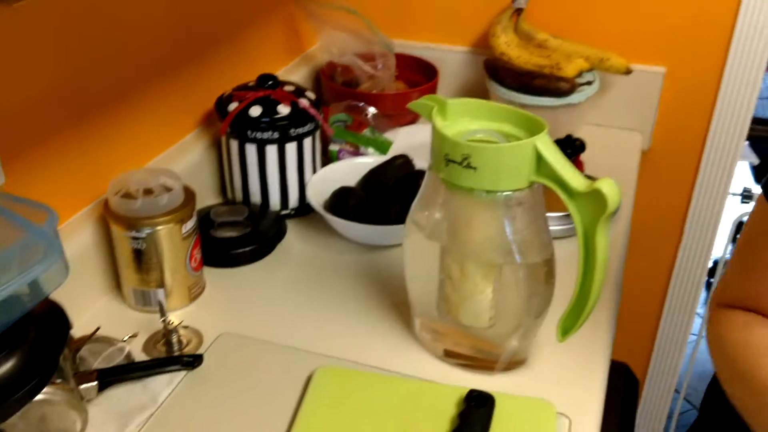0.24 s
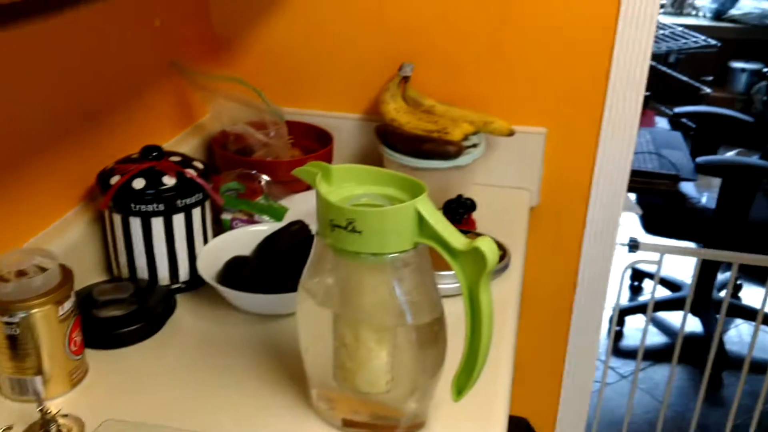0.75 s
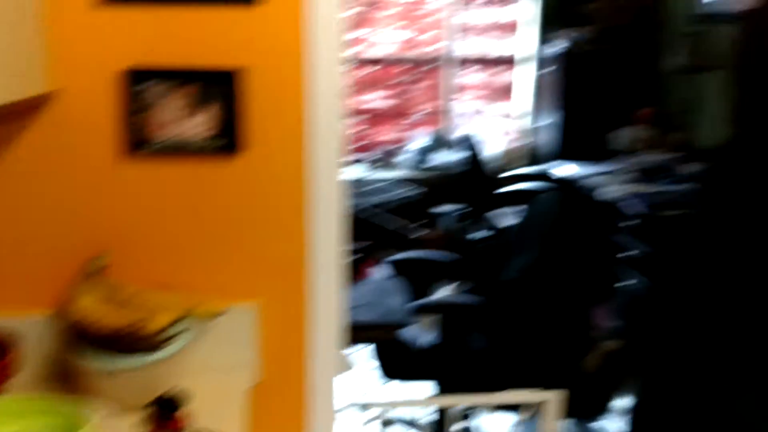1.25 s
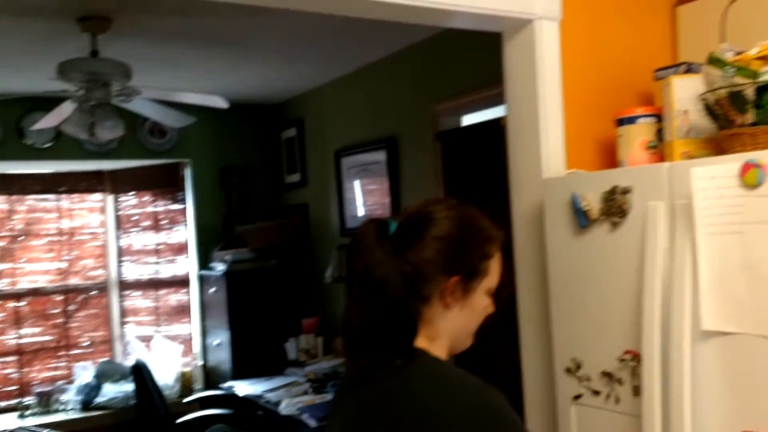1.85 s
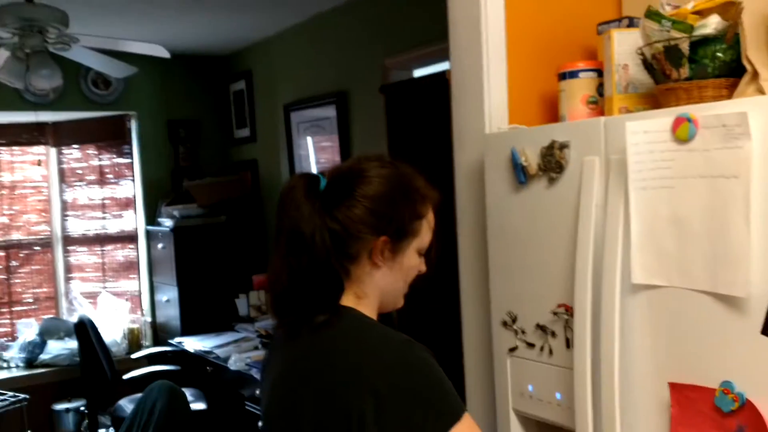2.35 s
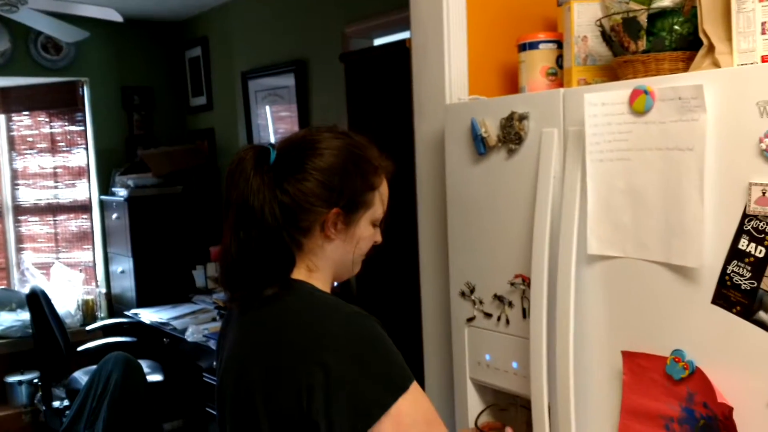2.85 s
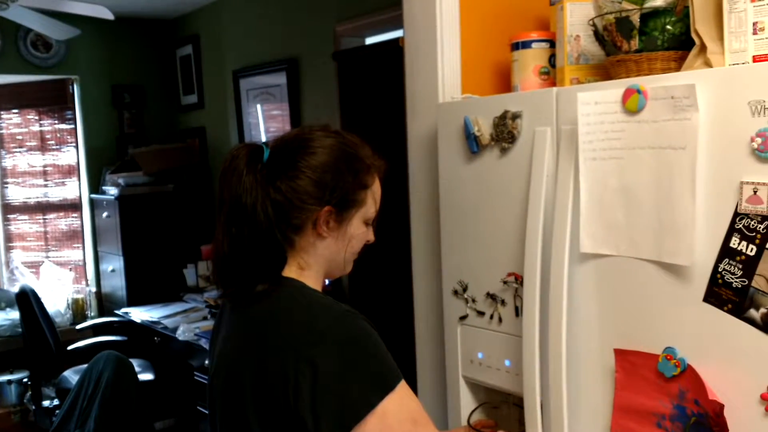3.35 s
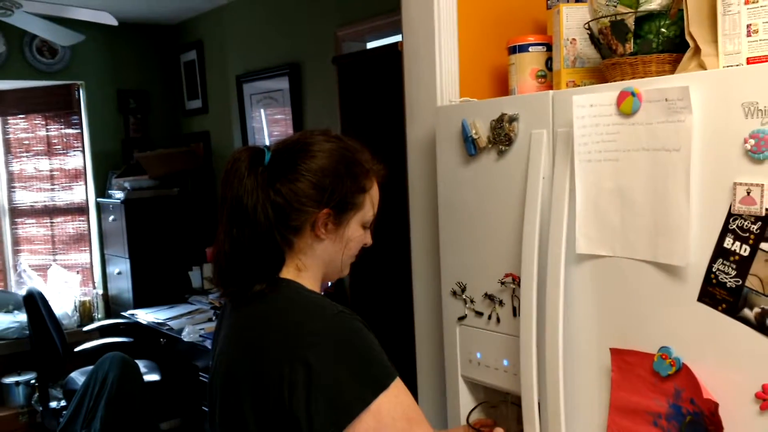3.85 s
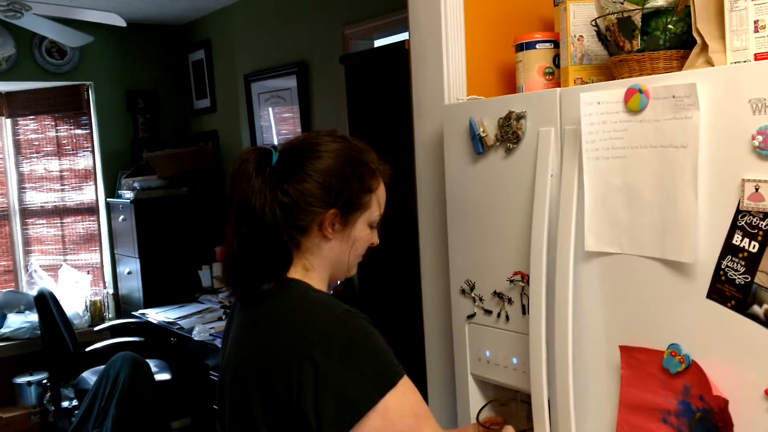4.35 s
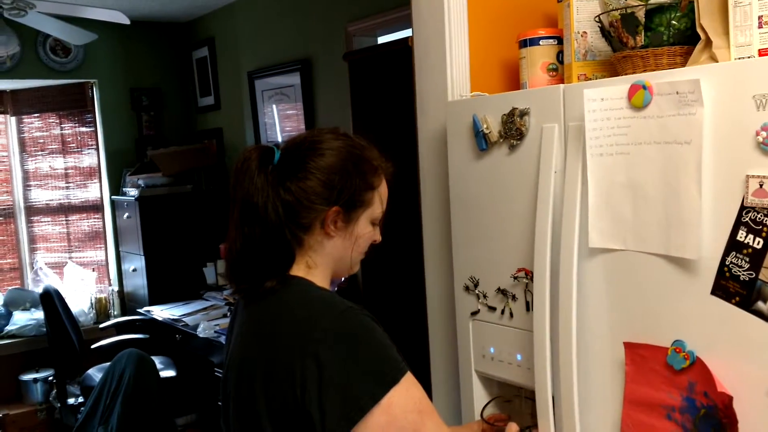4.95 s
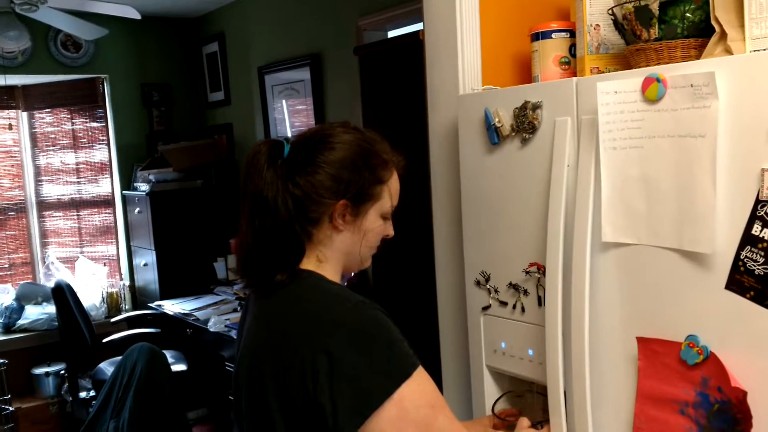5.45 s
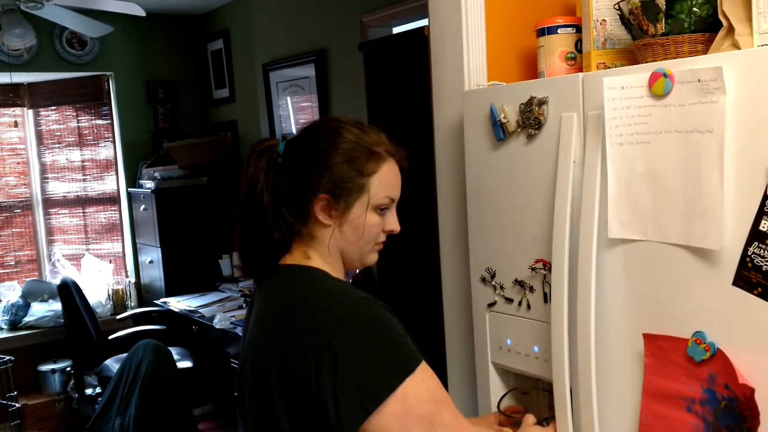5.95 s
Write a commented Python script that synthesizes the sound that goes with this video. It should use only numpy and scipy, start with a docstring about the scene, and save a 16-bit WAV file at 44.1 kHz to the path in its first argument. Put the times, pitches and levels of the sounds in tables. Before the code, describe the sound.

Soft bumps on a hand-held microphone and the scuff of a shoe lead to a quick cluster of thuds and clacks as a jug meets a refrigerator's water dispenser. The lever clicks, and water hisses and splashes steadily into the jug over the buzz of the valve, glugging more as it fills. It is heard from a few steps away in a small kitchen with a low appliance hum.

```python
"""Filling a jug at the refrigerator door

A small kitchen, heard from a few steps away on a hand-held pair of microphones that picks up soft
bumps from the hand. Over the compressor's hum a foot scuffs, a glass jug knocks into the dispenser's
recess and the lever snaps. The valve buzzes and hisses, and the jet drags air under the water,
where the bubbles ring as patter, plinks, splashes and gurgles."""
import sys
import numpy as np
from scipy import signal
from scipy.fft import rfft, irfft, next_fast_len
from scipy.io import wavfile

SR = 44100
rng = np.random.default_rng(int(sys.argv[2]) if len(sys.argv) > 2 else 0)


def wrap_up_sound(samples):
    """Save the sound to the file named by the first command line argument, as 16-bit audio."""
    columns = np.atleast_2d(samples).T
    # keep every value between -1 and 1, then stretch to whole-number steps
    tamed = np.clip(columns, -1, 1)
    steps = np.round(tamed * 32767).astype(np.int16)
    wavfile.write(sys.argv[1], SR, steps)


N = 272979
TIME = np.arange(N) / SR


def from_db(db):
    """Decibels to gain."""
    return 10 ** (np.asarray(db) / 20)


def rms_one(x):
    """Scale to unit rms."""
    return x / np.sqrt(np.mean(x ** 2) + 1e-20)


def at_hz(points, hz):
    """Read a table on a log-frequency axis."""
    f, value = np.transpose(points)
    return np.interp(np.log(np.maximum(hz, 1)), np.log(f), value)


def drift(per_s):
    """A random wander of unit rms."""
    knots = rng.standard_normal(1000)
    return rms_one(np.interp(TIME * per_s, np.arange(len(knots)), knots))


def as_event(x):
    """Give a short sound the energy of 10 ms at unit rms."""
    return x * np.sqrt(SR / 100 / (np.sum(x ** 2) + 1e-20))


def add(track, s, sound):
    """Mix a sound into a track at s seconds."""
    at = int(s * SR)
    track[at:at + len(sound)] += sound[:max(N - at, 0)]


def pair_noise(size):
    """White noise at both microphones, alike in the midrange, nearly unrelated at either end."""
    # Each row: frequency in Hz, likeness of left and right from 0 to 1.
    likeness = [(60, 0.078), (500, 0.25), (1100, 1), (1500, 0.94), (2200, 0.99), (3600, 0.87), (4300, 1),
                (5000, 0.7), (7500, 0.54), (9500, 0.029), (16000, 0.067)]
    alike = np.clip(at_hz(likeness, np.fft.rfftfreq(size, 1 / SR)), 0, 1)
    mid, side = rfft(rng.standard_normal((2, size)))
    return irfft(np.sqrt((1 + alike) / 2) * mid + np.sqrt((1 - alike) / 2) * side * [[1], [-1]], size)


def hiss(spectrum):
    """Steady stereo noise with a spectrum in dB per Hz."""
    size = next_fast_len(N, real=True)
    gain = from_db(at_hz(spectrum, np.fft.rfftfreq(size, 1 / SR))) * np.sqrt(SR / 2)
    return irfft(rfft(pair_noise(size)) * gain, size)[:, :N]


def hum(harmonics, base_hz, waver_db):
    """Harmonics of a mains-driven part, each wavering a little in level."""
    out = 0
    for multiple, db in harmonics:
        amplitude = np.sqrt(2) * from_db(db + waver_db * drift(12))
        out = out + amplitude * np.sin(2 * np.pi * (multiple * base_hz * TIME + rng.random()))
    return out


def struck(modes, times, levels_db, tilts=0):
    """Each blow rings a part's modes unevenly; a tilt in dB per octave brightens hard contacts."""
    t, out = TIME[:SR // 4], np.zeros(N)
    hz, db, t60 = np.transpose(modes)[:, :, None]
    rings = from_db(db - 60 * t / t60) * np.sin(2 * np.pi * hz * t)
    signs = (-1) ** np.arange(len(modes))
    for s, level_db, tilt in np.broadcast(times, levels_db, tilts):
        strengths = signs * from_db(tilt * np.log2(hz[:, 0]) + 2 * rng.standard_normal(len(modes)))
        add(out, s, from_db(level_db) * as_event(strengths @ rings))
    return out


def room_tone():
    """Still air and the steady hum of the compressor."""
    # Each row: frequency in Hz, level in dB per Hz.
    air = [(30, -104), (60, -108), (120, -96.5), (250, -92), (500, -98.5), (1000, -100), (1700, -104),
           (2200, -114), (3200, -107), (4800, -110), (9000, -106), (13000, -102), (15500, -105)]
    # Each row: multiple of the compressor's speed, rms level in dB.
    compressor = [(1, -74), (2, -76)]
    return hiss(air) + hum(compressor, base_hz=59.2, waver_db=-1.5)


def finger_taps():
    """Fingers tick on the microphone housing, which rings briefly."""
    # Each row: start in seconds, level in dB.
    taps = [(0.212, -62.5), (.257, -59), (.679, -63.5)]
    # Each row: mode frequency in Hz, relative level in dB, t60 in seconds.
    housing = [(750, 13, 0.01), (1160, 9, 0.011), (1600, 6, 0.0076)]
    return struck(housing, *np.transpose(taps))


def handling():
    """Bumps, slips and tremor of the hand push the two microphones in opposite directions."""
    # Each row: start in seconds, level in dB, pitch in Hz that the bump sags towards.
    bumps = [(.228, -40, 56.4), (0.681, -45, 80), (0.805, -49, 66.6), (0.943, -42.5, 62), (1.354, -46, 63),
             (1.474, -40, 81.5), (1.516, -35, 83), (2.745, -37.5, 60.7), (4.233, -34.5, 92)]
    t, out = TIME[:SR // 6], np.zeros(N)

    def thump(hz, cycles):
        """A heavily damped swing that starts sharp and sags."""
        pitch = hz * (1 + 1.24 * np.exp(-t * hz))
        return as_event(np.sin(2 * np.pi * np.cumsum(pitch) / SR) * np.exp(-t * hz / cycles))

    for s, db, hz in bumps:
        add(out, s, from_db(db) * as_event(thump(hz, cycles=0.26) * t))
    # The grip creaks in a run of small slips while the hand turns.
    turn_start_s, turn_end_s, slip_gap_s = 1.155, 1.305, 1 / 53
    slip_times = np.arange(turn_start_s, turn_end_s, slip_gap_s)
    for s, (late, size, detune) in zip(slip_times, 2 * rng.random((100, 3)) - 1):
        slip = thump(hz=98 * np.exp(0.49 * detune), cycles=1)
        add(out, s + 0.26 * late * slip_gap_s, from_db(-44 + 4 * size) * slip)
    low_band = signal.butter(2, [55, 120], "band", fs=SR, output="sos")
    tremor = rms_one(signal.sosfilt(low_band, rng.standard_normal(N)))
    return (out + from_db(-60 + 2 * drift(13)) * tremor) * [[-.6], [1.15]]


def stroke(peak_s, release_s):
    """The envelope of one slide of the sole: a quick swell and a slower release."""
    attack_s = 0.4 * release_s
    return np.exp(np.minimum((TIME - peak_s) / attack_s, (peak_s - TIME) / release_s))


def foot_scuffs():
    """Soft scuffs and rustles, each with its own brightness."""
    # Each row: peak time in seconds, gain in dB, release in seconds, tilt in dB per octave.
    scuffs = [(.65, -22, 1, 6.5), (0.837, -9.5, 0.069, 1.5), (0.958, 0.5, 0.053, 5), (1.06, -2.5, 0.16, 1),
              (1.429, -7.5, 0.37, -1)]
    # Friction noise. Each row: frequency in Hz, relative level in dB.
    sole = [(500, -81), (1100, -86), (1750, -88), (2300, -86.5), (3500, -90), (7000, -90.5), (10000, -94.5),
            (15000, -99)]
    out = 0
    for s, db, release_s, tilt in scuffs:
        friction = hiss([(hz, level + tilt * np.log2(hz / 3500)) for hz, level in sole])
        out = out + from_db(db) * stroke(s, release_s) * friction
    return out * from_db(1.5 * drift(61.5))


def foot_rasps():
    """The sole catches on the floor in short gritty rasps."""
    # Each row: peak time in seconds, gain in dB, release in seconds.
    catches = [(.835, -1.5, 0.031), (0.971, -4, 0.098), (1.07, -7, 0.039)]
    # Each row: frequency in Hz, relative level in dB.
    narrow_band = [(1100, -115), (1500, -92.5), (1800, -79.5), (2050, -94), (2600, -120)]
    envelope = sum(from_db(db) * stroke(s, release_s) for s, db, release_s in catches)
    return envelope * from_db(2.2 * drift(150)) * hiss(narrow_band)


def jug_knocks():
    """The jug thuds on the door, clacks in the plastic recess and snaps the lever: three tracks."""
    # Each row: start in seconds, thud, clack and snap levels in dB, clack tilt in dB per octave.
    knocks = [(1.505, -23.5, -24, -51, -2), (1.555, -29.5, -32, -43, 5), (1.74, -44, -36, -45, -2.5),
              (1.8219, -37.5, -21, -24.5, 5), (1.887, -27.5, -34.5, -56, -5)]
    # Modes of the two parts. Each row: frequency in Hz, relative level in dB, t60 in seconds.
    door = [(100, -12, 0.1), (180, -4, 0.053), (224.5, -8.5, 0.24), (254, -6.5, 0.075), (321, -1.5, 0.11),
            (329, -3.5, 0.044), (365.5, 0, 0.1), (620, -6, 0.035)]
    recess = [(714, -3, 0.021), (1024, -3, 0.022), (1220, 2.5, 0.0085), (1620, 3, 0.0089),
              (1670, -0.5, 0.01), (2180, 6.5, 0.0077), (2703, -9.5, 0.029), (3060, 2.5, 0.0017)]
    stages = [(-.0036, 9.5), (0, 0), (0.033, 11.5)]  # first touch, blow, bounce
    contacts = [(s + delay_s, *(np.array(levels) - loss_db), tilt)
                for s, *levels, tilt in knocks for delay_s, loss_db in stages]
    times, thud_db, clack_db, snap_db, tilts = np.transpose(contacts)
    snap = lever_snaps(times, snap_db)
    low_cut = signal.butter(3, 556, "high", fs=SR, output="sos")
    clack = signal.sosfilt(low_cut, struck(recess, times, clack_db, tilts))
    thud = struck(door, times + 0.002, thud_db)  # the heavy door answers a little late
    return thud, clack, snap


def lever_snaps(times, levels_db, burst_s=0.0013):
    """Stiff plastic cracks for a millisecond or two, and the lever's spring rings faintly."""
    # Each row: frequency in Hz, relative level in dB.
    crack_spectrum = [(2500, -43), (3800, 5), (4500, -14), (4850, 5.5), (5400, 16), (6000, 8), (8000, 0),
                      (11500, 1.5), (15500, 2.5)]
    # Each row: mode frequency in Hz, relative level in dB, t60 in seconds.
    spring = [(5120, -13, 0.04), (5650, -9, 0.024)]
    t, out = TIME[:SR // 40], np.zeros(N)
    colour = from_db(at_hz(crack_spectrum, np.fft.rfftfreq(len(t), 1 / SR)))
    for s, db in zip(times, levels_db):
        crack = irfft(rfft(rng.standard_normal(len(t))) * colour, len(t))
        add(out, s, from_db(db) * as_event(crack * np.exp(-t / burst_s)))
    return out + struck(spring, times, levels_db - 9)


def valve(open_s=2.05):
    """The solenoid buzzes and water rushes through the open valve."""
    # Each row: multiple of the mains frequency, rms level in dB.
    buzz = [(2, -71.5), (4, -71), (6, -60.5), (8, -70.5), (11, -71.5), (12, -67.5), (14, -66.5), (16, -75),
            (20, -78.5), (28, -81.5)]
    # Each row: frequency in Hz, relative level in dB.
    rush = [(130, -105), (210, -87.5), (330, -84.5), (480, -92.5), (700, -83.5), (1000, -100.5),
            (1500, -102), (2500, -105), (5000, -108), (10000, -111), (12700, -109), (13100, -99),
            (13450, -112), (15000, -114)]
    opened = np.clip((TIME - open_s) / 0.08, 0, 1)
    return opened * (hum(buzz, base_hz=60, waver_db=2) + from_db(2.5) * hiss(rush))


def splashes(cycles=25.6, length_s=.016, count=20):
    """Each splash sheds a quick flurry of small bubbles, thinning out."""
    # Each row: start in seconds, level in dB, centre pitch in Hz, pitch spread in octaves.
    flurries = [(2.108, -52.5, 9160, 0.33), (2.722, -58, 7450, .08), (2.86, -50.5, 5550, 0.31),
                (3.086, -53, 9700, 0.16), (3.146, -54.5, 11200, 0.11), (3.187, -57, 9250, 0.16),
                (3.248, -51, 8800, 0.091), (3.308, -50.5, 11600, 0.24), (3.69, -48.5, 10600, 0.46),
                (3.712, -49.5, 2890, 0.13), (3.712, -57, 5740, 0.13), (3.806, -52.5, 5840, 0.14),
                (3.992, -45.5, 13300, 0.22), (3.992, -49, 2740, 0.72), (4.006, -50, 2900, 0.542),
                (4.162, -46.5, 5670, 0.48), (4.169, -46.5, 2770, 0.27), (4.313, -47, 2610, 0.17),
                (4.519, -44, 3100, 0.45), (4.846, -47.5, 2220, 0.8), (4.941, -43.5, 8800, 0.16),
                (4.942, -56, 1890, 0.19), (5.046, -44, 2340, 0.093), (5.145, -49, 2600, 0.21),
                (5.274, -54.5, 3320, 0.085), (5.47, -54, 2820, 0.11), (5.495, -49.5, 2560, 0.26),
                (5.545, -55, 12000, 0.3), (5.57, -50, 2730, 0.34), (5.78, -59, 5400, 0.11),
                (5.907, -44.5, 2230, 0.19), (6.053, -52, 11100, 0.24)]
    t, out = TIME[:SR // 16], np.zeros(N)
    for s, db, centre_hz, octaves in flurries:
        late, up, down = rng.random((3, count, 1))
        hz = centre_hz * 2 ** (np.sqrt(6) * octaves * (up - down))
        age = np.maximum(t - length_s * late ** 2, 0)
        rings = np.exp(-np.log(1000) * age * hz / cycles - late) * np.sin(2 * np.pi * hz * age)
        add(out, s, from_db(db) * as_event(rings.sum(axis=0)))
    return out


def nozzle(peak_s=2.45, rise_db_per_s=100, fade_db_per_s=1):
    """The jet hisses thinly as it starts and fades as it settles."""
    # Each row: frequency in Hz, relative level in dB.
    jet = [(5000, -125), (10500, -114), (13000, -101), (15000, -110)]
    age = TIME - peak_s
    return from_db(5 + np.minimum(rise_db_per_s * age, -fade_db_per_s * age)) * hiss(jet)


def bubble_cloud(spectrum, power, per_s, cycles, spread_db, fall_oct_per_s=0):
    """Bubbles of random pitch and size ring for some cycles; they come thicker as the power rises."""
    rate = per_s * np.clip((power / np.mean(power)) ** .7, .02, 15)
    born = np.cumsum(rate) / SR
    late, pitch_draw, size_draw, sign_draw = rng.random((20000, 4))[:int(born[-1])].T
    starts = np.minimum(np.searchsorted(born, np.arange(len(late)) + late), N - 1)
    low_hz, high_hz = spectrum[0][0], spectrum[-1][0]
    pitches = low_hz * (high_hz / low_hz) ** pitch_draw
    scatter_db = spread_db * np.minimum(-np.log(1 - size_draw), 3.5)
    sizes = rms_one(from_db(at_hz(spectrum, pitches) + scatter_db))
    heights = sizes * np.sign(sign_draw - .5) * np.sqrt(power[starts] / rate[starts])
    # With a fall, bubbles start high and sink to the listed pitches as the jug fills.
    pitches = pitches * 2 ** (fall_oct_per_s * (TIME[-1] - TIME[starts]))
    out = np.zeros(N)
    for at, hz, height in zip(starts, pitches, heights):
        t60 = cycles / hz
        t, damping = TIME[:int(t60 * SR)], np.log(1000) / t60
        ring = 2 * np.sqrt(damping) * np.exp(-damping * t) * np.sin(2 * np.pi * hz * t)
        add(out, at / SR, height * ring)
    return out


def stream(lands_s=2.7, pool_forms_s=1.3):
    """The jet drags air under: a growing gurgle, surface splatter, fine spray and stray plinks."""
    # Four families of bubbles. Each row: pitch in Hz, relative level in dB.
    gurgle = [(520, -26), (610, 19), (700, 11.5), (800, 9.5), (1000, 8), (1350, -9)]
    splatter = [(1000, 3), (1400, -0.5), (1650, -2.5), (2100, 8), (2600, 2), (3200, 2.5), (3900, 0)]
    spray = [(4000, 23), (4900, 11.3), (7500, 16), (10000, 0.69), (15000, 4.6)]
    plinks = [(1100, -3), (1700, -2), (2600, 11.5)]
    filling_s = np.maximum(TIME - lands_s, 0)
    landed = np.clip(filling_s / .2, 0, 1)
    # Splatter is weak until a pool has formed, then softens by 1 dB a second as it deepens.
    pool_age_s = filling_s - pool_forms_s
    pool_db = np.minimum(15 * pool_age_s / pool_forms_s, -pool_age_s)
    gurgle_power, splatter_power, spray_power = [
        landed * from_db(db + 1.8 * drift(25)) ** 2
        for db in (-71 + 3.5 * filling_s, -60 + pool_db, -64.5)]
    plink_power = landed * from_db(-63.5 + pool_db / 2) ** 2
    return (bubble_cloud(gurgle, gurgle_power, per_s=350, cycles=43, spread_db=5, fall_oct_per_s=0.176)
            + bubble_cloud(splatter, splatter_power, per_s=330, cycles=60, spread_db=3.5)
            + bubble_cloud(spray, spray_power, per_s=600, cycles=45, spread_db=8.5)
            + bubble_cloud(plinks, plink_power, per_s=16, cycles=65, spread_db=-3.5))


def ping(hz, db, cycles, swell_cycles, rise):
    """A sine swells and dies away while its pitch climbs, like a bubble nearing the surface."""
    age_cycles = TIME[:SR // 8] * hz
    pitch = hz * (1 + rise * (np.minimum(age_cycles / cycles, 1) - 1 / 4))
    envelope = (1 - np.exp(-(age_cycles / swell_cycles) ** 2)) * from_db(-60 * age_cycles / cycles)
    return from_db(db) * as_event(np.sin(2 * np.pi * np.cumsum(pitch) / SR) * envelope)


def drips():
    """Drips and small splashes in the pool, each a short pitched ping."""
    # Each row: start in seconds, level in dB, pitch in Hz.
    pings = [(2.864, -55, 5030), (2.9, -58, 5770), (3.122, -62, 4650), (3.169, -51, 2300),
             (3.309, -51.5, 2310), (3.415, -53, 1470), (3.428, -51, 2250), (3.505, -59, 3600),
             (3.519, -55, 6940), (3.54, -56, 1690), (3.65, -52.5, 2554), (3.68, -46.5, 7150),
             (3.72, -54, 2490), (3.86, -55.5, 4650), (3.908, -51.5, 1750), (4.172, -45.5, 2655),
             (4.215, -50, 2300), (4.47, -57, 4770), (4.787, -60.5, 4830), (4.845, -56, 4910),
             (4.854, -42, 2110), (4.897, -59, 4830), (4.974, -49.5, 1894), (4.996, -56, 4740),
             (5.535, -63, 4850), (5.659, -44.5, 4940), (5.67, -43, 2190), (5.909, -53, 1700),
             (6.05, -53, 1850)]
    out = np.zeros(N)
    for s, db, hz in pings:
        add(out, s, ping(hz, db, cycles=63, swell_cycles=5.7, rise=0.028))
    return out


def glugs(fragments=7, gap_s=.011, fade_db_per_s=90):
    """A pocket of air goes under as one big bubble and breaks into a dying run of smaller ones."""
    # Each row: start in seconds, level in dB, pitch in Hz, tending deeper as the jug fills.
    pockets = [(3.335, -50.5, 1030), (4.321, -42, 990), (4.516, -50, 1170), (4.848, -50.5, 1260),
               (4.892, -45, 880), (5.025, -47.5, 1000), (5.142, -49, 926), (5.486, -33.5, 754),
               (5.668, -40, 800), (5.938, -46, 746), (5.992, -45, 648), (6.024, -41.5, 657)]
    out = np.zeros(N)
    for s, db, hz in pockets:
        add(out, s, ping(hz, db, cycles=26.5, swell_cycles=8.7, rise=0.25))
        for k, (late, smaller) in enumerate(rng.random((fragments, 2)), 1):
            delay_s = gap_s * (k + late)
            small_hz, small_db = hz * np.exp(0.26 * smaller), db - 10 - fade_db_per_s * delay_s
            add(out, s + delay_s, ping(small_hz, small_db, cycles=20, swell_cycles=2, rise=.15))
    return out


def kitchen(x, direct_db, early_db, early_s, tail_db):
    """Direct sound, a cluster of reflections from the recess and walls, and a tail that dies by band."""
    # Each row: band centre in Hz, reverberation time (t60) in seconds.
    bands = [(100, 0.52), (400, 0.47), (2000, 0.38), (6000, 0.39), (15000, 0.19)]
    t = TIME[:SR // 2]
    white, hz = rfft(pair_noise(len(t))), np.fft.rfftfreq(len(t), 1 / SR)
    centres, tail = [row[0] for row in bands], 0
    for share, (_, t60) in zip(np.eye(len(bands)), bands):
        tail = tail + irfft(white * np.interp(hz, centres, share), len(t)) * from_db(-60 * t / t60)
    early = pair_noise(len(t)) * t * np.exp(-t / early_s)
    response = (from_db(early_db) * rms_one(early) + from_db(tail_db) * rms_one(tail)) / np.sqrt(len(t))
    response[:, 0] += from_db(direct_db)
    return signal.fftconvolve(x[None], response, axes=1)[:, :N]


def scene():
    """Knocks and water echo in the kitchen, over jet, valve, foot, room tone and handling."""
    water = stream() + splashes()
    background = room_tone()
    thud, clack, snap = jug_knocks()
    in_room = (kitchen(thud, direct_db=-2, early_db=-13, early_s=0.005, tail_db=-7)
               + kitchen(clack, direct_db=-5.5, early_db=-16.5, early_s=0.0056, tail_db=-4.5)
               + kitchen(snap, direct_db=-2.5, early_db=-13, early_s=0.003, tail_db=-6)
               + kitchen(water, direct_db=-3, early_db=-3, early_s=0.0052, tail_db=-1.5)
               + kitchen(drips() + glugs(), direct_db=-1, early_db=-13, early_s=0.008, tail_db=-4))
    hand = handling() + finger_taps()
    return in_room + nozzle() + valve() + foot_scuffs() + foot_rasps() + background + hand


def record(dry):
    """The recorder adds peaks near 2 and 5 kHz, colours the sides differently and cuts both ends."""
    # Each row: centre in Hz, width in Hz, boost in dB.
    colour_peaks = [(1710, 55, 3), (2095, 544, 9), (4793, 298, 8.5)]
    # Each row: frequency in Hz, left minus right in dB.
    balance = [(100, 2.5), (1000, -2.5), (2200, -0.15), (5000, -1.5), (7500, 2.5), (10000, 2),
               (13000, -4.5), (15500, -5)]
    left_lag_s, lag_from_hz = 0.0004614, 1065  # the left side lags in the treble
    low_cut_hz, high_cut_hz = 48, 15500
    for hz, width_hz, db in colour_peaks:
        dry = dry + (from_db(db) - 1) * signal.lfilter(*signal.iirpeak(hz, hz / width_hz, fs=SR), dry)
    size = next_fast_len(N + SR // 10, real=True)
    f, spectra = np.fft.rfftfreq(size, 1 / SR), rfft(dry, size)
    spectra *= from_db(at_hz(balance, f) * [[.5], [-.5]])
    spectra[0] *= np.exp(-2j * np.pi * np.maximum(f - lag_from_hz, 0) * left_lag_s)
    spectra *= (f / low_cut_hz) ** 4 / np.sqrt(1 + (f / low_cut_hz) ** 8)
    high_cut = signal.ellip(12, .1, 90, high_cut_hz, fs=SR, output="sos")
    return signal.sosfilt(high_cut, irfft(spectra, size)[:, :N])


dry = scene()
out = record(dry)
wrap_up_sound(out)
```